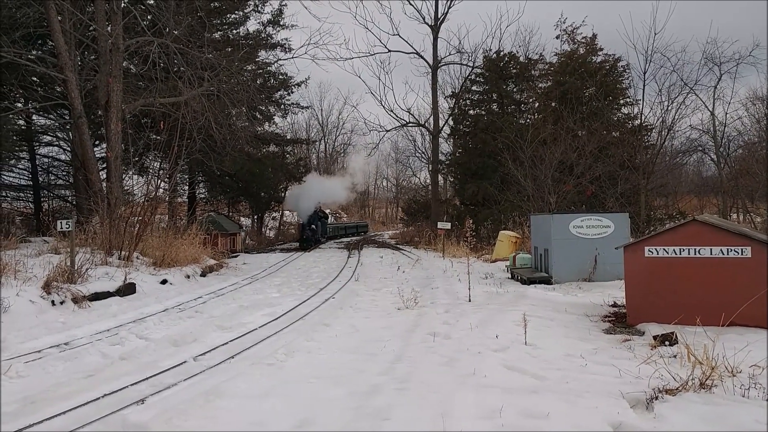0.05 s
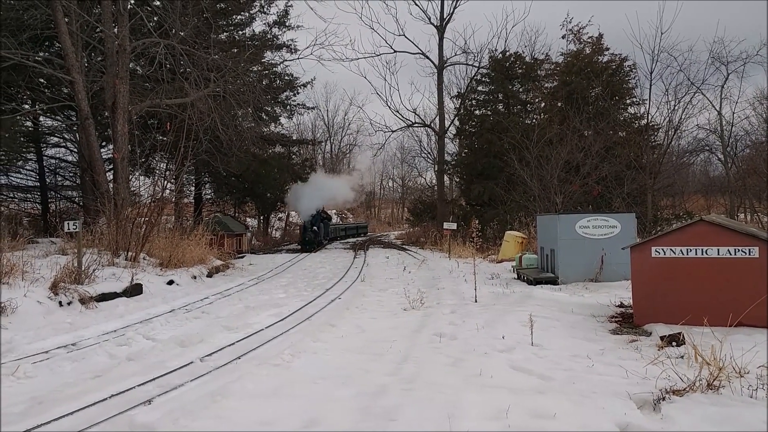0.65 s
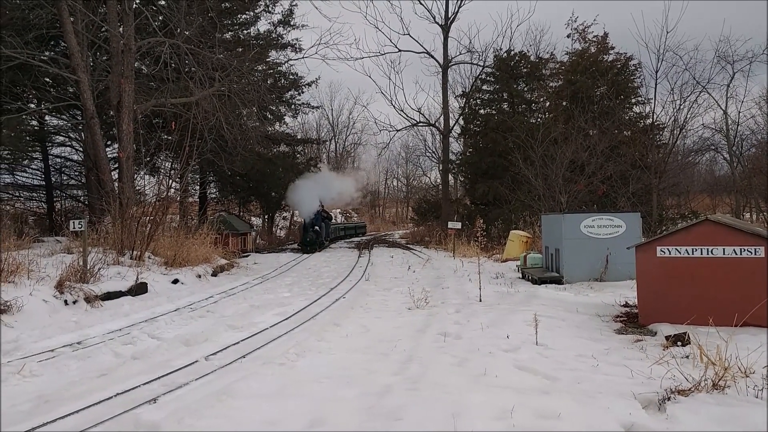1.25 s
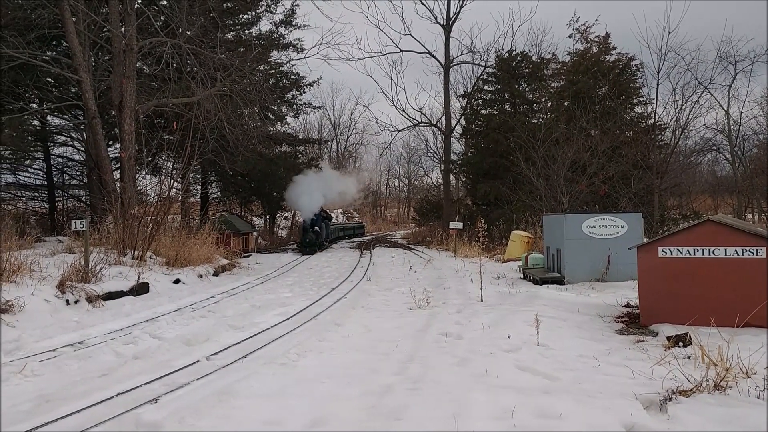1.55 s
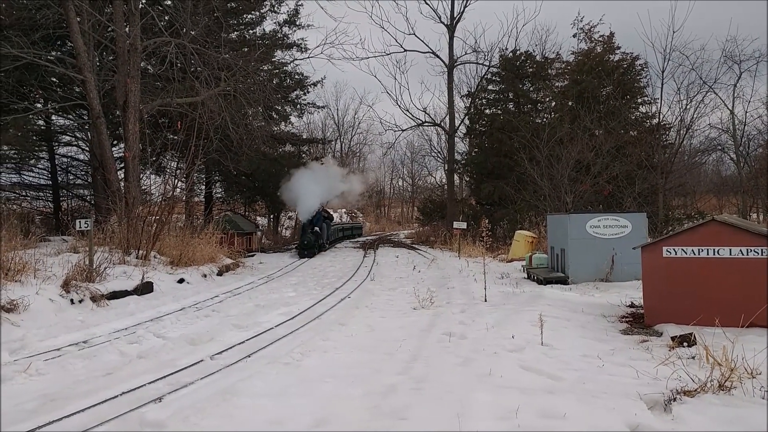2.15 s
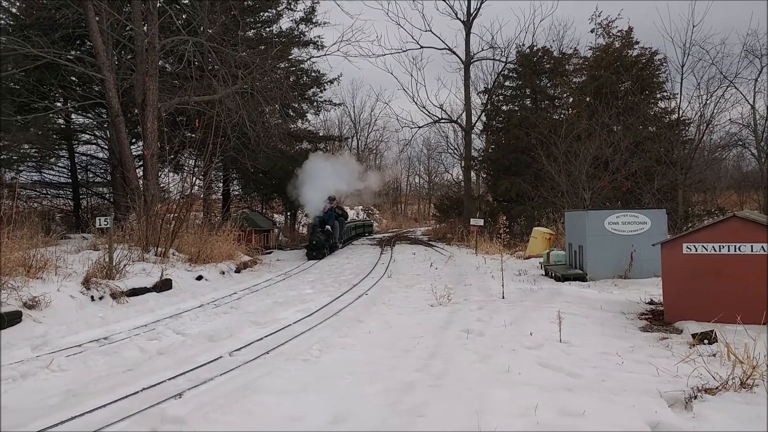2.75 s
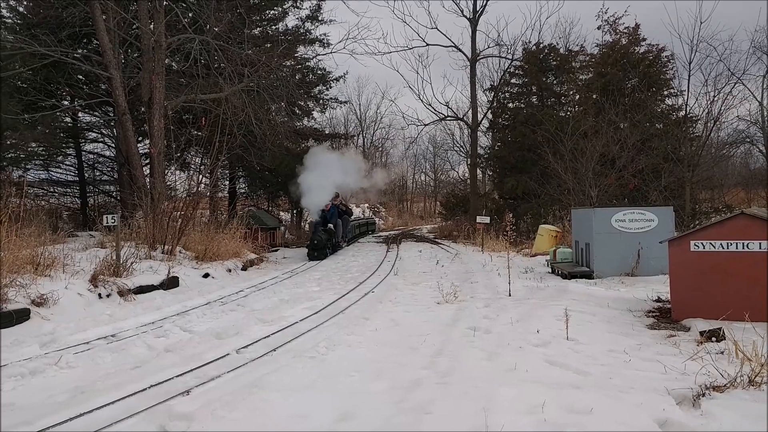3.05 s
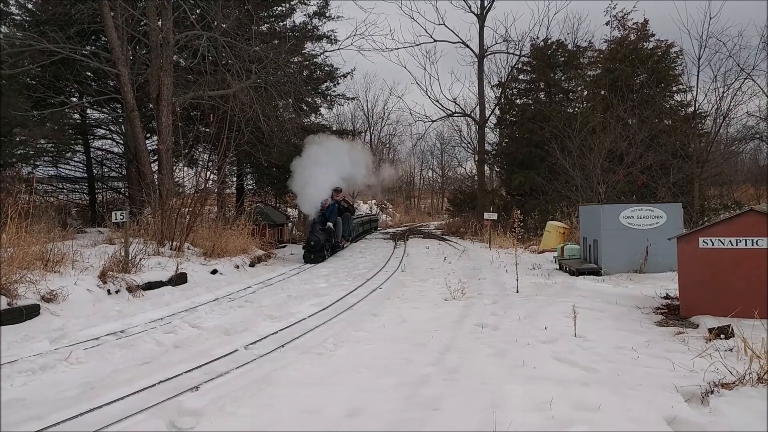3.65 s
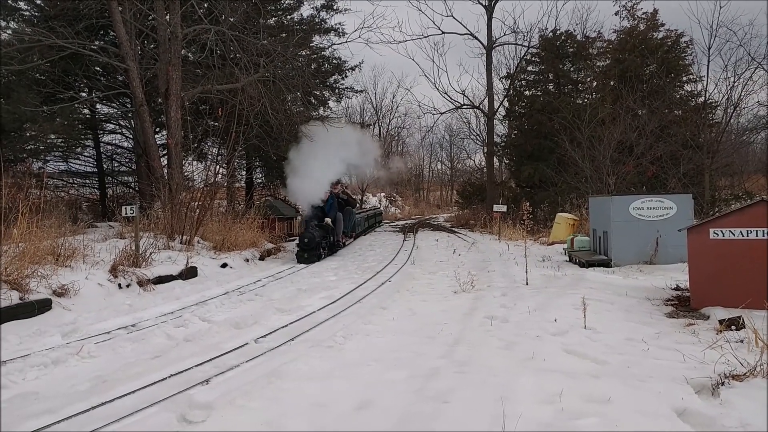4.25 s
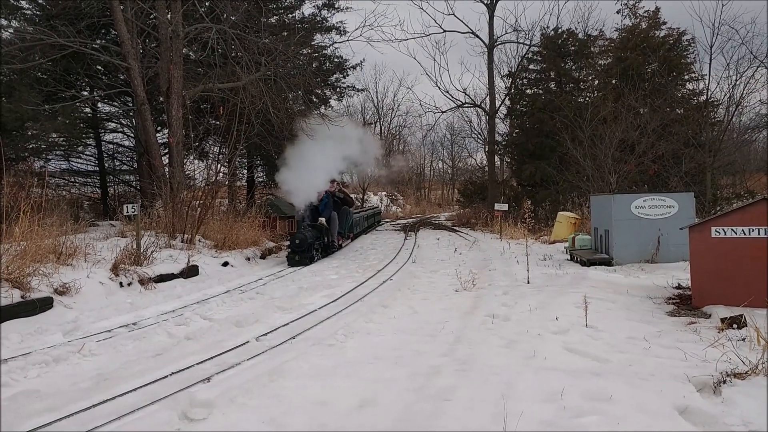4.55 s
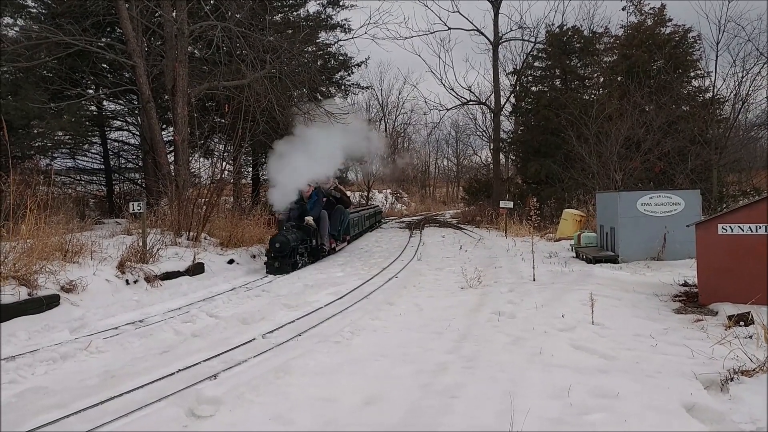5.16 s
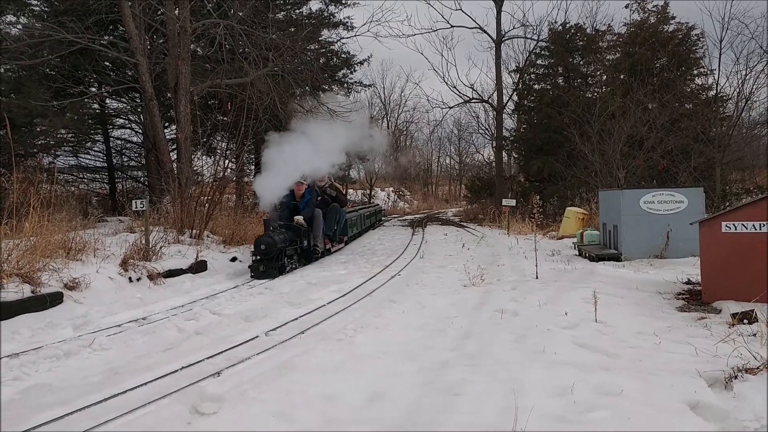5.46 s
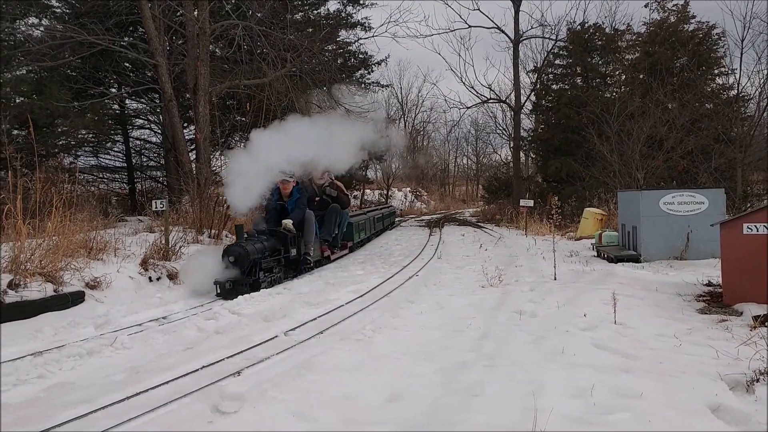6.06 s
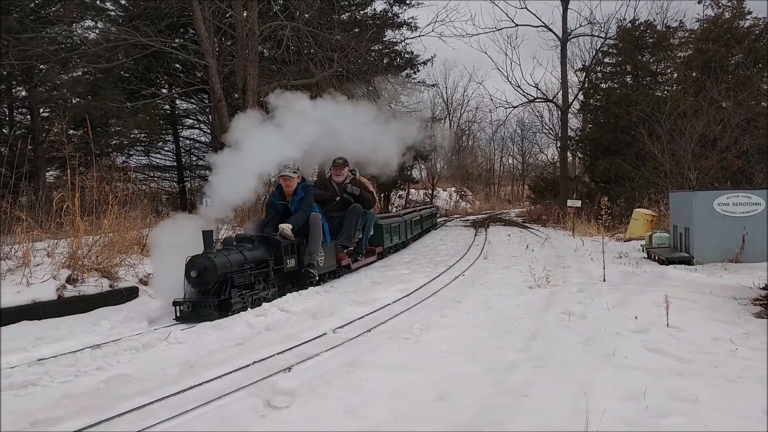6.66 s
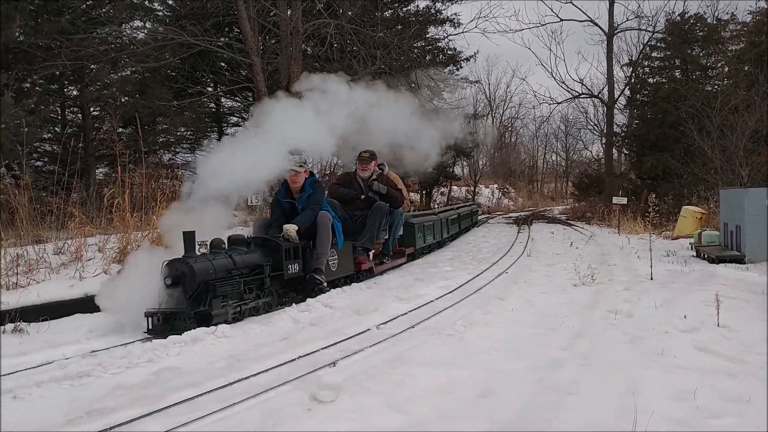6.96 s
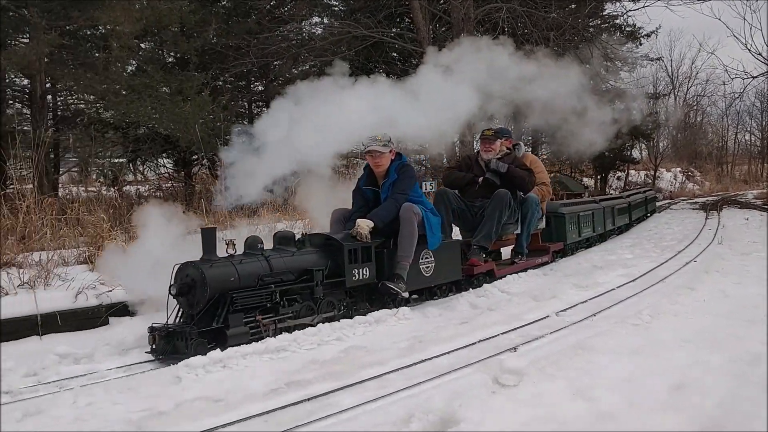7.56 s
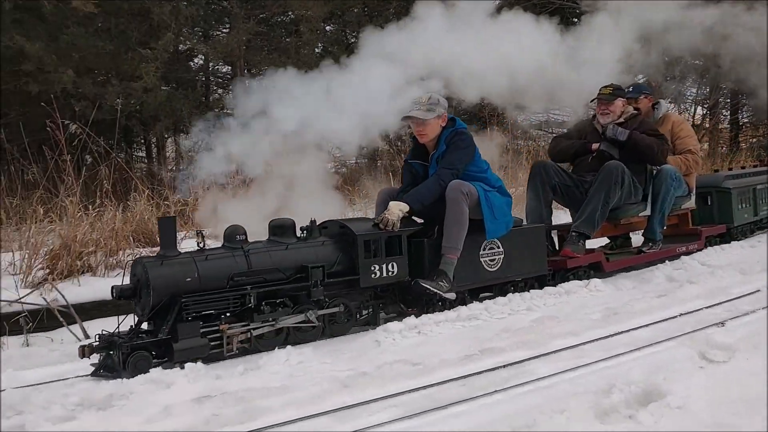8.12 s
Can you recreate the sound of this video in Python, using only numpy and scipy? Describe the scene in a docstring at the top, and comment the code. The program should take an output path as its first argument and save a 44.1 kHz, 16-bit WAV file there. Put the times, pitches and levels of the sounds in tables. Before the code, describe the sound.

Fast, slightly hollow puffs from a small steam engine come steadily nearer over a low wheel rumble, soft thuds and little spurts of steam. The puffing eases, then two hissy whistle blasts sound, the second louder. The train ends up right beside the microphone, its loose rods knocking, metal parts ticking and ringing, and cylinder drains hissing. The setting is open air with only a faint echo.

```python
"""A miniature steam locomotive approaches and passes close by, outdoors with a faint echo.
Its exhaust chuffs four times a wheel turn and rings the chimney. Slack rods clank, cars rumble and thud
over rail joints, cylinders and drains hiss, and a small piece of struck metal rings.
Steam blown through the pipes of a chime whistle gives two breathy blasts."""
import sys
import numpy as np
from scipy import signal
from scipy.fft import rfft, irfft, next_fast_len
from scipy.io import wavfile

SR = 44100
rng = np.random.default_rng(int(sys.argv[2]) if len(sys.argv) > 2 else 0)


def unload_audio(sound):
    """Save the sound as a 16-bit wav file, at the path given as the first command line argument."""
    columns = np.transpose(np.atleast_2d(sound))
    # keep every value between -1 and 1, then stretch to whole-number steps
    steps = np.round(np.clip(columns, -1, 1) * 32767)
    wavfile.write(sys.argv[1], SR, steps.astype(np.int16))


N = 365588
FFT_SIZE = next_fast_len(N, real=True)
TIME_S, FREQS_HZ = np.arange(N) / SR, np.fft.rfftfreq(FFT_SIZE, 1 / SR)

# cylinder leak spectrum: (frequency [Hz], level [dB])
LEAK_SPECTRUM = [(1500, -13), (3200, 0.5), (4300, 1), (5600, 1), (7000, -2.5), (8700, 3.5), (10300, 0.5),
                 (11300, 4), (12700, -0.5), (14000, -1), (16000, -9.5)]
# cylinder leak resonances: (frequency [Hz], width [Hz], gain [dB])
LEAK_PEAKS = [(8100, 160, 2.5), (9350, 300, 0), (11250, 300, -10), (12600, 420, 4.5)]
# drain hiss spectrum: (frequency [Hz], level [dB])
DRAIN_SPECTRUM = [(2500, -20), (4400, -13), (5500, -7), (7000, -4.5), (8500, -17), (10000, 0), (12500, 6),
                  (16000, 3)]


def amp(db):
    """Decibels to gain."""
    return 10 ** (np.asarray(db) / 20)


def unit_rms(x):
    """Scales to rms 1."""
    return x / np.sqrt(np.mean(x ** 2) + 1e-20)


def over_freq(points):
    """Interpolates (frequency [Hz], value) on a log axis at every FFT bin."""
    hz, value = np.transpose(points)
    return np.interp(np.log(FREQS_HZ + 1), np.log(hz + 1), value)


def over_time(points):
    """Interpolates (time [s], value) at every sample."""
    return np.interp(TIME_S, *np.transpose(points))


def wander(rate_hz):
    """Slow random motion of rms 1."""
    steps = rng.standard_normal(N // 40)
    return unit_rms(np.interp(2 * rate_hz * TIME_S, np.arange(len(steps)), steps))


def noise(spectrum, peaks=(), lag_ms=0.):
    """Coloured stereo noise of rms 1; the right channel lags."""
    # left-right likeness: (frequency [Hz], coherence [0-1])
    likeness = [(30, .7), (70, .94), (140, .97), (300, .88), (600, .88), (1400, .82), (3000, .65),
                (7000, .48), (15000, .35)]
    gain = amp(over_freq(spectrum))
    gain /= 1 + (FREQS_HZ / (1.5 * spectrum[-1][0])) ** 4
    gain /= 1 + (spectrum[0][0] / 2 / (FREQS_HZ + 1)) ** 4
    peak_power = sum(amp(db) ** 2 / (1 + (2 * (FREQS_HZ - hz) / width_hz) ** 2) ** 1.5
                     for hz, width_hz, db in peaks)
    gain *= np.sqrt(1 + peak_power)
    left, other = rng.standard_normal((2, 2 * len(FREQS_HZ))).view(complex)
    coherence = over_freq(likeness)
    right = coherence * left + np.sqrt(1 - coherence ** 2) * other
    right *= np.exp(-2j * np.pi * FREQS_HZ * lag_ms / 1000)
    return unit_rms(irfft(np.array([left, right]) * gain, FFT_SIZE)[:, :N])


def bursts(times_s, levels_db, rise_s, decay_s, tail_db, tail_s):
    """Envelope of a row of blows: each swells, dies fast and leaves a weaker tail."""
    t, power = np.arange(SR // 3) / SR, np.zeros(N + SR)
    attack = 1 - np.exp(-(t / rise_s) ** 2)
    shape = attack * (np.exp(-t / decay_s) + amp(tail_db) * np.exp(-t / tail_s))
    for s, db in zip(times_s, levels_db):
        if 0 <= s < N / SR:
            power[round(s * SR):][:len(t)] += (amp(db) * shape / shape.max()) ** 2
    return np.sqrt(power[:N])


def pipe(hz, level_db, jitter, third_db, lag_ms=.05):
    """A stopped pipe blown with wet steam: an unsteady tone with a weak third harmonic."""
    pitch_hz = hz * (1 + jitter * wander(48))
    lag_s = np.array([[0], [lag_ms / 1000]])
    phase = 2 * np.pi * (np.cumsum(pitch_hz) / SR - pitch_hz * lag_s)
    tone = np.sin(phase) + amp(third_db) * np.sin(3 * phase)
    return np.sqrt(2) * amp(level_db + .6 * wander(30)) * tone


def closeness(s=TIME_S, speed_m_per_s=3., nearest_m=4., nearest_s=8.7):
    """Nearest over present distance on a straight track: 1 when the engine is side-on."""
    return nearest_m / np.hypot(nearest_m, speed_m_per_s * (s - nearest_s))


def passing_db(near_db, falloff, s=TIME_S):
    """Level of a source on the train; amplitude goes as 1 / distance ** falloff."""
    return near_db + falloff * 20 * np.log10(closeness(s))


def each_turn(phase_turns, start_turns=-.0234):
    """Times [s] at which the driving wheels reach one angle."""
    # driving wheel speed: (time [s], rate [turns/s])
    wheel_rate = [(0, 3.926), (2.5, 4.163), (4.9, 4.507), (5.6, 4.43), (6.6, 4.391), (8.29, 4.015)]
    angle_turns = start_turns + np.cumsum(over_time(wheel_rate)) / SR
    marks = np.arange(np.ceil(angle_turns[-1]) + 1) + phase_turns
    return np.interp(marks, angle_turns, TIME_S, left=-1, right=N / SR + 1)


def throttle(ease_at_s=4.23, ease_length_s=.43):
    """1 while the engine pulls, 0 once the driver has eased off."""
    return np.clip(1 - (TIME_S - ease_at_s) / ease_length_s, 0, 1)


def exhaust(pull_ring_db=5, pull_hiss_db=10):
    """Four puffs a wheel turn hiss from the blast nozzle and ring the chimney, over a steady draught."""
    # uneven exhaust beats: (wheel angle [turns], relative level [dB])
    beats = [(-.087, 6.5), (0.148, 1.5), (0.389, 4.5), (0.646, 5.5)]
    # spectra: (frequency [Hz], level [dB])
    chimney_spectrum = [(500, -5), (690, -14.5), (790, 0.5), (1080, -3), (1400, 0.5), (2500, -28)]
    nozzle_spectrum = [(250, -16), (420, -4), (560, -10), (690, -42), (830, -13), (1080, -18), (1300, -5),
                       (1650, -0.5), (1950, -4.5), (2380, -4.5), (3400, -1), (4400, -10), (7000, -11.5),
                       (12000, -9), (16000, -29)]
    # resonances: (frequency [Hz], width [Hz], gain [dB])
    chimney_peaks = [(767, 210, 25), (1412, 187, 27.9)]
    nozzle_peaks = [(2140, 124, 5), (2844, 260, 7)]
    times_s = np.concatenate([each_turn(angle) for angle, _ in beats])
    levels_db = np.repeat([db for _, db in beats], len(times_s) // len(beats))
    levels_db = levels_db - .08 * rng.standard_normal(len(times_s))
    puffs = bursts(times_s, levels_db, rise_s=.0067, decay_s=.028, tail_db=-7.5, tail_s=.072)
    flow = unit_rms(np.hypot(puffs, .24))  # puffs plus draught
    ring_db = passing_db(-48.5, falloff=.95) + pull_ring_db * throttle()
    hiss_db = passing_db(-54.5, falloff=.62) + pull_hiss_db * throttle()
    ring = amp(ring_db) * noise(chimney_spectrum, chimney_peaks, lag_ms=.004)
    hiss = amp(hiss_db) * noise(nozzle_spectrum, nozzle_peaks, lag_ms=.0035)
    return flow * (ring + hiss) * amp(wander(4))


def wheels(light_joints_per_s=2.2):
    """Cars rumble; wheels roar, grind and thud over rail joints."""
    # spectra: (frequency [Hz], level [dB])
    rumble_spectrum = [(20, -25), (45, -23), (65, -13), (80, -3.5), (95, -7.5), (125, -2.5), (175, -0.5),
                       (230, -4), (285, -14.5), (400, -28)]
    roar_spectrum = [(200, -17), (285, -17), (335, 0.5), (400, 0), (480, -1.5), (585, -4.5), (670, -18),
                     (810, -20), (1080, -21), (1400, -18), (2000, -24), (5000, -48)]
    grind_spectrum = [(300, -32), (570, 2.5), (690, -4), (790, 4.5), (900, 1), (1070, -3), (1300, -3),
                      (1600, -0.5), (2300, -8.5), (3300, -8.5), (4300, -11), (8000, -21), (16000, -14.5)]
    thud_spectrum = [(50, -43), (100, -3.5), (160, 5.5), (220, -9), (320, -14.5), (550, -20), (690, -44),
                     (1000, -50)]
    # heaviest drops over a joint: (time [s], level [dB])
    heavy_joints = [(0.028, -48), (.14, -48), (.455, -52), (.635, -48), (.926, -43), (1.367, -43.5),
                    (2.3, -42), (3.727, -44), (5.217, -45), (5.332, -38.5), (5.61, -43), (5.689, -40.5),
                    (6.073, -40), (6.555, -41), (6.649, -41), (7.929, -39.5)]
    rumble = amp(passing_db(-43.3, falloff=.5) + 1.22 * wander(12)) * noise(rumble_spectrum)
    roar = amp(passing_db(-49, falloff=.44) + 1.96 * wander(15)) * noise(roar_spectrum)
    grind = amp(passing_db(-40.3, falloff=2.1) + 2.94 * wander(25)) * noise(grind_spectrum, lag_ms=.079)
    light_s = TIME_S[rng.random(N) < light_joints_per_s / SR]
    light_db = passing_db(-47, falloff=.2, s=light_s)
    s, db = np.hstack([np.transpose(heavy_joints), [light_s, light_db]])
    thuds = bursts(s, db, rise_s=.0051, decay_s=.02, tail_db=-10.5, tail_s=.095) * noise(thud_spectrum)
    return rumble + roar + grind + thuds


def leak(pull_db=1.5):
    """Steam leaks unevenly from the cylinders, more at each piston stroke and while pulling."""
    s = np.concatenate([each_turn(-.016), each_turn(.39)])
    strokes = bursts(s, np.zeros(len(s)), rise_s=.0054, decay_s=.013, tail_db=-18, tail_s=.031)
    level_db = passing_db(-45, falloff=.79) + pull_db * throttle() + 2 * wander(22) + 1.26 * wander(7.1)
    return amp(level_db) * np.hypot(.85, .7 * strokes) * noise(LEAK_SPECTRUM, LEAK_PEAKS, lag_ms=.025)


def rod_knocks(scatter_db=1.5, side_on_db=13):
    """Slack rods knock each turn, loudest side-on. Returns (time [s], treble [dB], body [dB])."""
    # knocks in one turn: (wheel angle [turns], base treble [dB], base body [dB])
    knocks = [(0, -32.5, -42), (.41, -42, -46), (.68, -45, -44)]
    rows = []
    for angle, treble_db, body_db in knocks:
        s = each_turn(angle)
        level_db = passing_db(-scatter_db * rng.standard_normal(len(s)), falloff=.93, s=s)
        side_db = side_on_db * closeness(s) ** .91
        rows += zip(s, treble_db + level_db + side_db, body_db + level_db + .88 * side_db)
    return rows


def rods(rattle_count=260):
    """Slack rods, couplings and levers scrape briefly, then knock; a fine rattle fills the gaps."""
    # stray coupling and lever clanks: (time [s], relative treble [dB], relative body [dB])
    clanks = [(0.2374, -36, -56), (.243, -40, -57), (.393, -40.5, -61), (1.922, -50, -41),
              (2.1584, -47, -54), (2.575, -41, -42), (3.524, -36.5, -44), (3.657, -40, -46),
              (4.214, -39, -37), (5.016, -57, -55), (5.238, -48, -49), (5.4484, -48, -38),
              (5.686, -34.5, -44), (6.368, -34, -40), (6.557, -26, -31.5), (6.564, -29, -33),
              (7.376, -43, -30), (7.615, -42, -32), (7.6837, -27, -23.5), (7.837, -33, -32),
              (7.845, -36, -33), (7.9292, -27.5, -30), (7.939, -32, -32), (8.022, -36, -34),
              (8.099, -34, -29.5), (8.1055, -27, -33), (8.192, -33, -34), (8.235, -33, -33)]
    # spectra: (frequency [Hz], level [dB])
    clink_spectrum = [(1500, -16), (3200, 7), (4300, -2.5), (5600, 2.5), (7000, -4), (11500, 0.5),
                      (14000, 2.5), (16000, -13)]
    clunk_spectrum = [(200, 6.5), (500, 0), (690, 3), (830, -1), (1080, -2.5), (1450, -0.5), (2200, -2.5),
                      (3200, -13), (4500, -17), (8000, -23)]
    # rod resonances: (frequency [Hz], width [Hz], gain [dB])
    steel_peaks = [(2960, 400, -2.5), (5600, 550, -3.5), (8500, 2000, 7.5)]
    s, treble_db, body_db = np.transpose(rod_knocks() + clanks)
    scrape = bursts(s - .007, treble_db - 28, rise_s=.011, decay_s=.0047, tail_db=-23, tail_s=.014)
    clink = bursts(s - .0005, treble_db - 4.5, rise_s=.0025, decay_s=.0013, tail_db=-29.5, tail_s=.013)
    clunk = bursts(s - .001, body_db - 5, rise_s=.0014, decay_s=.0015, tail_db=-10, tail_s=.013)
    when, softness = rng.random((rattle_count, 2)).T
    rattle_s, rattle_db = when * N / SR, -15 * np.sqrt(softness)
    rattle = bursts(rattle_s, rattle_db, rise_s=.0059, decay_s=.0058, tail_db=-18, tail_s=.009)
    rattle *= amp(passing_db(-36.5, falloff=1))
    treble = np.hypot(clink + scrape, rattle) * noise(clink_spectrum, steel_peaks, lag_ms=.0091)
    body = np.hypot(clunk, .5 * rattle) * noise(clunk_spectrum, lag_ms=.03)
    return treble + body


def woods_echo(x, t60_s=.66, wet_db=-14, delay_s=.025, cutoff_hz=4000):
    """Trees and sheds scatter back a faint, dull echo."""
    t = np.arange(SR) / SR
    taps = rng.standard_normal((2, SR)) * (rng.random((2, SR)) < .05)
    taps *= amp(-60 * t / t60_s) * (t > delay_s)
    taps = signal.lfilter(*signal.butter(1, cutoff_hz, fs=SR), taps / np.linalg.norm(taps[0]))
    return amp(wet_db) * signal.fftconvolve(x.mean(0)[None], taps, axes=1)[:, :N]


def spits():
    """Single spurts of steam escape from the cylinders and their drains."""
    # spurts: (time [s], half length [s], level [dB], drain share of power [0-1])
    spurts = [(.408, 0.01, -47.5, 0.037), (.933, 0.011, -47.5, 0.077), (1.195, 0.011, -47.5, 0.02),
              (1.252, 0.011, -52, 0.52), (1.47, 0.023, -50, 0.0021), (1.66, 0.13, -55, 0.16),
              (1.855, 0.0044, -56, .6), (2.42, 0.042, -50, 0), (3.87, 0.013, -46, 0.081),
              (4.435, .01, -47, .4), (5.546, 0.0052, -44, .2), (7.367, 0.008, -39, 0.071),
              (7.465, 0.01, -35.5, 0), (7.637, .009, -36, 0.81), (7.79, 0.0045, -41, .3),
              (7.877, .014, -42, 1), (8.245, .012, -37, 0.8)]
    leak_power, drain_power = np.zeros((2, N))
    for s, half_s, db, drain_share in spurts:
        power = amp(db) ** 2 * np.exp(-np.minimum(((TIME_S - s) / half_s) ** 2, 100))
        leak_power += power * (1 - drain_share)
        drain_power += power * drain_share
    leak_hiss = np.sqrt(leak_power) * noise(LEAK_SPECTRUM, LEAK_PEAKS, lag_ms=.028)
    return leak_hiss + np.sqrt(drain_power) * noise(DRAIN_SPECTRUM, lag_ms=.047)


def hard_puffs(chimney_hz=1394):
    """The hardest puffs bark at the nozzle and ring the chimney on one clear note."""
    # puffs: (time [s], ring [dB], bark [dB])
    puffs = [(.495, -55, -50), (.612, -56, -61), (1.358, -52, -52), (1.495, -64, -48.5), (1.737, -56, -48),
             (1.785, -60, -56), (1.915, -53, -52), (2.398, -55, -46), (2.638, -48, -62),
             (2.699, -46.5, -54), (2.818, -55, -49), (3.285, -53, -54), (3.358, -49, -58),
             (3.412, -52, -53), (3.458, -47, -54), (3.645, -50, -49), (4.1, -52, -60), (4.322, -45, -56),
             (4.49, -49.5, -71), (4.77, -49, -55), (4.99, -47, -66), (5.442, -44, -61)]
    # nozzle bark: (frequency [Hz], level [dB])
    bark_spectrum = [(1500, -8), (2400, -10), (2900, 7), (3400, -2), (4200, -14), (8000, -34)]
    s, ring_db, bark_db = np.transpose(puffs)
    note = pipe(chimney_hz, 0, jitter=.014, third_db=-35, lag_ms=.004)
    ring = bursts(s, ring_db, rise_s=.0035, decay_s=.012, tail_db=-14, tail_s=.071)
    bark = bursts(s, bark_db, rise_s=.0062, decay_s=.01, tail_db=-24, tail_s=.027)
    return ring * note + bark * noise(bark_spectrum, lag_ms=.004)


def ticks():
    """Light steel parts tap with a thin, bright tick."""
    # taps: (time [s], level [dB])
    taps = [(2.02, -44), (3.722, -41), (4.888, -40), (5.112, -35), (5.135, -33.5), (5.335, -38.5),
            (5.595, -37), (7.69, -35), (7.745, -34.5), (7.767, -23.5), (7.931, -40), (8.0095, -24),
            (8.1075, -28), (8.111, -26.5), (8.2567, -26)]
    # tick spectrum: (frequency [Hz], level [dB])
    spectrum = [(3000, -22), (5600, -5), (8000, -1.5), (10500, 2), (13000, 2), (16000, -7)]
    s, db = np.transpose(taps)
    envelope = bursts(s, db, rise_s=.0012, decay_s=.0012, tail_db=-27, tail_s=.01)
    return envelope * noise(spectrum, lag_ms=.014)


def ringing(strikes, modes, attack_s):
    """Struck metal rings in decaying modes; soft jolts spare the top ones."""
    out = np.zeros((2, N + 3 * SR))
    lowest_hz, top_hz = modes[0][0], modes[-1][0]
    for s, strike_db, tilt_db_per_oct, top_db in strikes:
        for hz, mode_db, t60_s in modes:
            t = np.arange(round(t60_s * SR)) / SR
            phase = 2 * np.pi * (hz * t + rng.random() + .48 * rng.random((2, 1)))
            hardness_db = tilt_db_per_oct * np.log2(hz / lowest_hz) + top_db * (hz == top_hz)
            level_db = strike_db + mode_db + hardness_db - 60 * t / t60_s
            envelope = amp(level_db) * np.minimum(t / attack_s, 1)
            out[:, round(s * SR):][:, :len(t)] += envelope * np.sin(phase)
    return out[:, :N]


def struck_metal():
    """A small metal piece rings long; the hardest knocks ring a rod briefly."""
    # strikes: (time [s], level [dB], tilt [dB/octave], top mode boost [dB])
    piece_strikes = [(4.337, -38.5, -25, 0), (4.462, -31.5, -10, 9), (5.785, -54, -12, 0),
                     (6.32, -32.5, -24, 2), (7.45, -25.5, -1.5, 1), (7.655, -34.5, -30, 0)]
    rod_strikes = [(7.767, -54, -3, 0), (8.0102, -33.5, 4.5, -7), (8.257, -23, -1, 3)]
    # modes: (frequency [Hz], level [dB], t60 [s])
    piece_modes = [(5168, -17, 1.95), (7208, -30, .7), (10782, 1, .45), (10860, -15, .35), (11133, -5, .45)]
    rod_modes = [(3278, -2, .04), (3600, 1, .02), (5400, -5, .03), (6024, -4, .03), (6864, 0, .008),
                 (7709, -5, .025), (8527, -2, .018), (10900, -3, .022), (12250, -6, .025)]
    piece = ringing(piece_strikes, piece_modes, attack_s=.0022)
    return piece + ringing(rod_strikes, rod_modes, attack_s=.00021)


def drains(open_at_s=5.7, opening_s=1):
    """The cylinder drains open and blow steam as the engine comes near."""
    opening = np.clip((TIME_S - open_at_s) / opening_s, 0, 1)
    level_db = passing_db(-44.5, falloff=.36) + 3.6 * wander(25)
    return opening * amp(level_db) * noise(DRAIN_SPECTRUM, lag_ms=.026)


def whistle(low_hz=860, middle_hz=1171, high_hz=1467, speak_flow=.22, lock_db=-44.5):
    """Steam flow blows three pipes in a roaring jet: the low sings, the middle catches, the high rasps."""
    # per blast, at full flow: (jet [dB], low pipe [dB], high pipe [dB])
    blasts = [(-28.5, -35.5, -62), (-24, -31.5, -44.5)]
    # valve curve per blast: (time [s], opening [0-1])
    valve = [
        [(5.71, 0), (5.75, .09), (5.77, .2), (5.85, .4), (5.96, .75), (6.1, .92), (6.284, 1), (6.308, .33),
         (6.345, 0)],
        [(6.612, 0), (6.655, .68), (6.72, .68), (6.9, .87), (7.2, 1), (7.255, .95), (7.28, .25), (7.31, 0)],
    ]
    # steam jet: (frequency [Hz], level [dB])
    jet_spectrum = [(600, -50), (740, -36), (860, -11), (980, -34), (1090, -42), (1200, -18), (1300, -9),
                    (1450, -7.5), (1560, -12), (1700, -4.5), (2050, -9), (2300, -5.5), (2420, -4.5),
                    (2700, 0), (3300, 2), (3850, -0.5), (4200, 2), (4780, -1), (5300, 0.5), (7500, 1.5),
                    (9600, 2), (11500, 5), (16000, -1.5)]
    # breathy pipe resonances: (frequency [Hz], width [Hz], first blast gain [dB], second blast gain [dB])
    pipe_peaks = [(858, 30, 13, 13), (1200, 50, 8, 11), (1440, 80, 13, 15.5), (1570, 120, -15, 6),
                  (1706, 70, 5, 9), (2030, 220, -15, 6), (2280, 110, 8, 2), (2566, 50, 7, 6),
                  (3120, 240, -3, -1), (4300, 130, 2, -6), (5370, 110, 5, 2), (6430, 130, 7, 9),
                  (7450, 200, -2, 4.5)]
    # middle pipe catches, robbing the low: (time [s], half length [s], level [dB], low pipe dip [dB])
    catches = [(6.216, 0.048, -48, -2), (6.296, 0.029, -34, 3), (6.915, 0.12, -39, 7),
               (7.036, 0.034, -39, -0.5), (7.168, 0.02, -42, 1), (7.271, 0.03, -46, 12)]
    middle_gain, robbed_db = amp(-51), 0
    for s, half_s, db, dip_db in catches:
        swell = np.exp(-((TIME_S - s) / half_s) ** 2)
        middle_gain += swell * amp(db)
        robbed_db += swell * dip_db
    middle_db = 20 * np.log10(middle_gain)
    sharpness = .035 / (1 + amp(middle_db - lock_db) ** 2)  # middle pipe is sharp until it locks
    out = np.zeros((2, N))
    for k, (jet_db, low_db, high_db) in enumerate(blasts):
        flow = over_time(valve[k])
        speaking = flow ** 4 / (flow ** 4 + speak_flow ** 4)
        tuning = 1 - .049 * (1 - flow) ** 2 + .00222 * wander(9)  # weak steam flattens, unsteady bends
        third_db = -19 + 20 * np.log10(flow + 1e-9)
        low = pipe(low_hz * tuning, low_db - robbed_db, jitter=.00414, third_db=third_db)
        middle_tuning = tuning + sharpness + .006 * wander(20)
        middle = pipe(middle_hz * middle_tuning, middle_db + 1.3 * wander(28), jitter=.0097, third_db=-28)
        high = pipe(high_hz, high_db + 2 * wander(15), jitter=.014, third_db=-22)
        peaks = [(hz, width_hz, gains_db[k]) for hz, width_hz, *gains_db in pipe_peaks]
        jet = amp(jet_db + .5 * wander(60)) * noise(jet_spectrum, peaks, lag_ms=.043)
        out += speaking * low + flow ** 2 * (middle + high) + flow ** .8 * jet
    return out


def valve_squeals():
    """Steam squeezes through the opening whistle valve and sings for a moment."""
    # squeals: (time [s], length [s], start pitch [Hz], end pitch [Hz], level [dB], jitter [fraction])
    squeals = [(5.775, 0.18, 4120, 4410, -41.5, 0.025), (5.846, .096, 5245, 5420, -32, 0.01),
               (6.651, 0.012, 6720, 6600, -27, .016), (6.652, 0.049, 5360, 5350, -30.5, .005)]
    out = np.zeros((2, N))
    for s, length_s, from_hz, to_hz, db, jitter in squeals:
        count = round(length_s * SR)
        hz = np.linspace(from_hz, to_hz, count) * (1 + jitter * wander(320)[:count])
        tone = np.sin(2 * np.pi * np.cumsum(hz) / SR)
        out[:, round(s * SR):][:, :count] += amp(db) * signal.windows.hann(count) * tone
    return out


def whistle_flares():
    """Pipe resonances take turns to lock on to the jet and swell into clear notes."""
    # notes: (frequency [Hz], jitter [fraction], swells as (time [s], half length [s], level [dB]))
    notes = [(870, 0.0063, [(6.58, 0.0068, -42), (7.305, .016, -42)]),
             (1448, 0.00716, [(5.92, 0.043, -43.5), (6.055, .03, -44), (6.125, 0.023, -46), (6.2, .03, -47),
             (6.665, 0.032, -35.5), (6.8, .03, -49), (6.88, 0.042, -35), (7.0, 0.033, -39),
             (7.15, 0.018, -33), (7.25, 0.023, -37)]), (1708, 0.0099, [(7.06, .04, -46),
             (7.245, 0.034, -40)]), (2267, 0.0129, [(5.99, 0.028, -40.5), (6.09, 0.03, -38),
             (6.18, 0.018, -39), (7.07, .02, -42), (7.21, .03, -45)]), (2580, 0.0025, [(5.9, 0.042, -42),
             (6.2, 0.084, -42), (6.67, 0.046, -44), (6.755, 0.088, -40.5), (6.98, 0.037, -39.5),
             (7.24, 0.033, -42)])]
    out = np.zeros((2, N))
    for hz, jitter, swells in notes:
        envelope = sum(amp(db) * np.exp(-((TIME_S - s) / half_s) ** 2) for s, half_s, db in swells)
        out += envelope * pipe(hz, 0, jitter, third_db=-32)
    return out


def scene():
    """The whole train in the open air; the nearer the engine, the drier it sounds."""
    engine = struck_metal() + exhaust() + hard_puffs() + rods() + ticks()
    engine += whistle() + whistle_flares() + valve_squeals()
    engine += leak() + spits() + drains()
    return engine + woods_echo(engine / closeness() ** .26) + wheels()


def record(dry, cutoff_hz=15900):
    """Slight left-right colour difference, then a low-pass."""
    # channel balance: (frequency [Hz], left minus right [dB])
    balance = [(60, 1), (200, .8), (600, -.4), (1300, .5), (2400, -1.2), (4400, -.3), (8000, -2.4),
               (15000, -3)]
    channel_gain = amp(over_freq(balance) * np.array([[.5], [-.5]]))
    coloured = irfft(rfft(dry, FFT_SIZE) * channel_gain, FFT_SIZE)[:, :N]
    lowpass = signal.firwin(511, cutoff_hz, window=("kaiser", 9), fs=SR)
    return signal.oaconvolve(coloured, lowpass[None], "same")


dry = scene()
out = record(dry)
unload_audio(out)
```